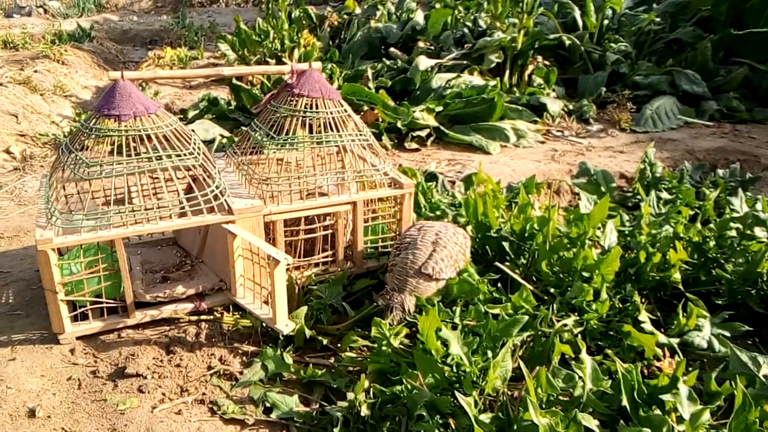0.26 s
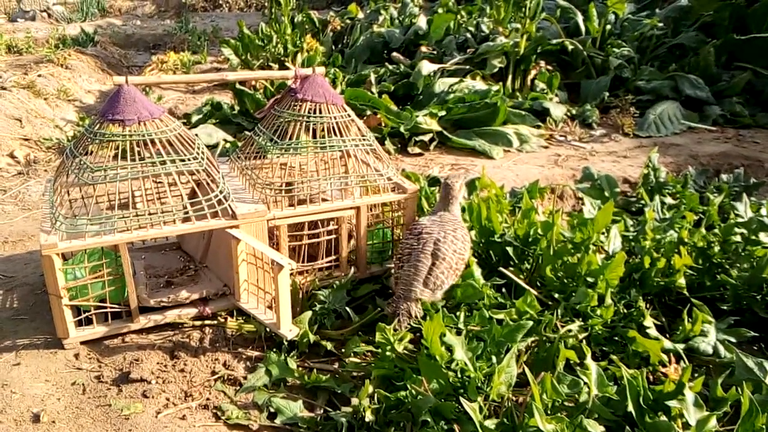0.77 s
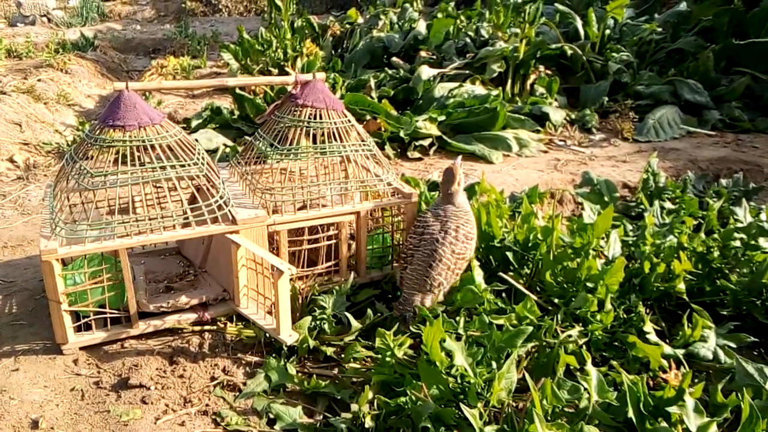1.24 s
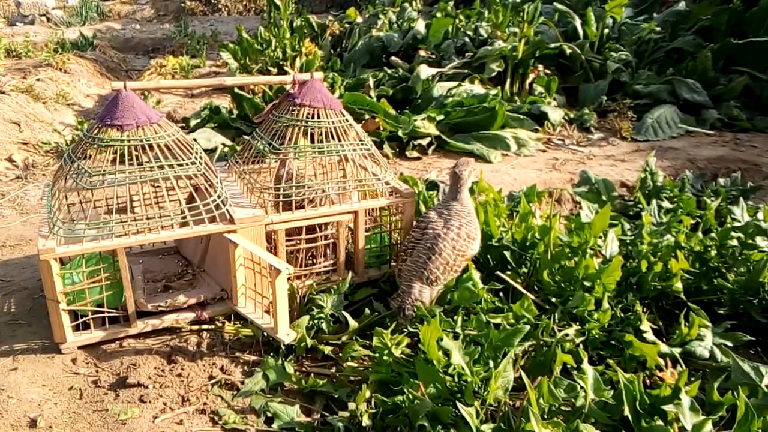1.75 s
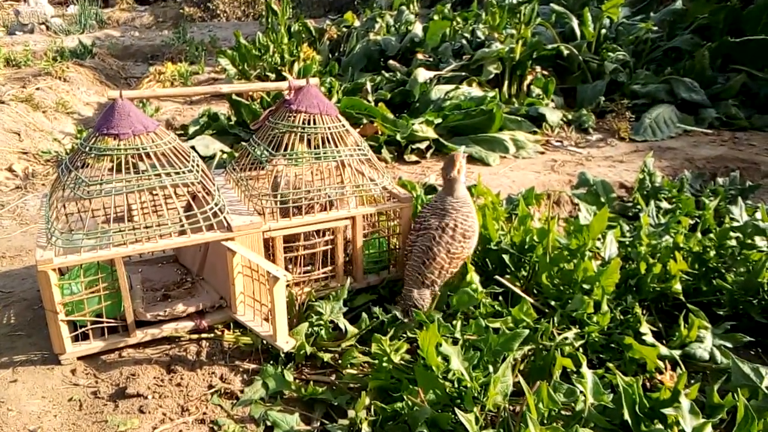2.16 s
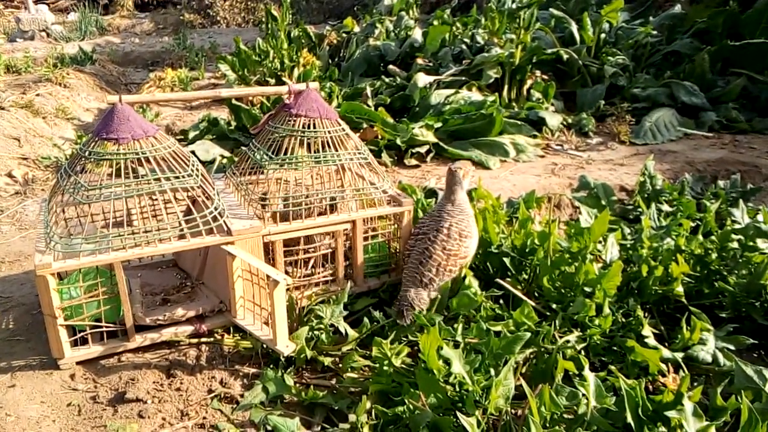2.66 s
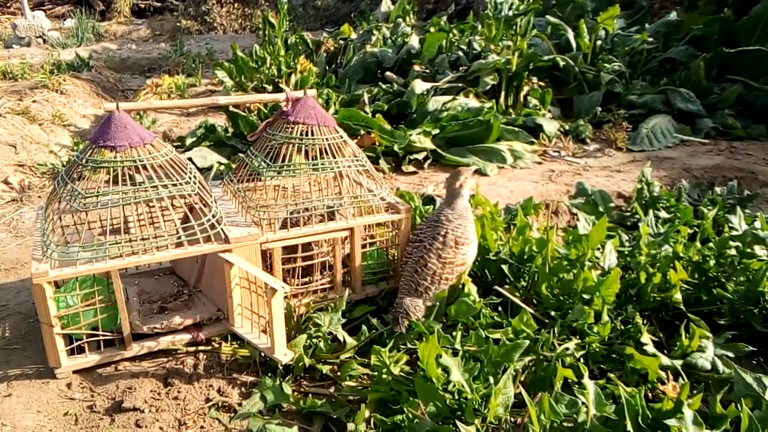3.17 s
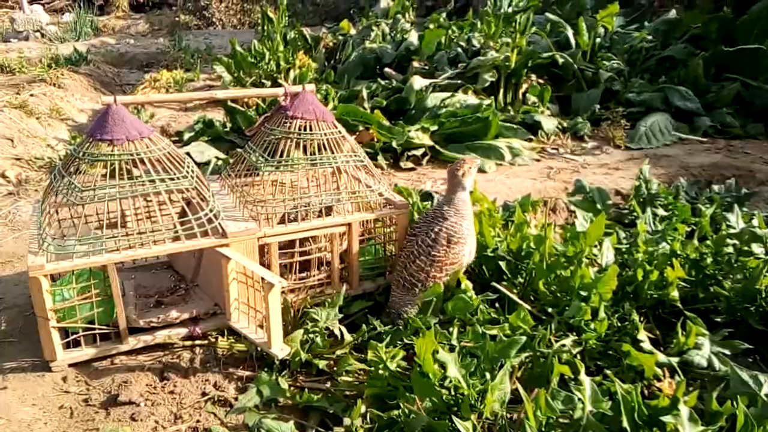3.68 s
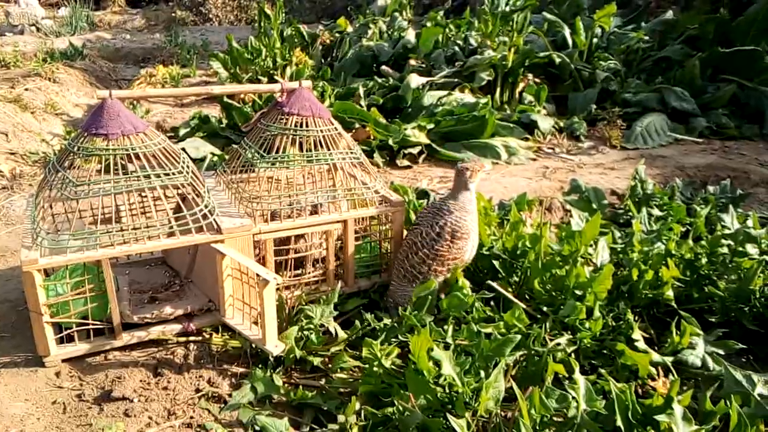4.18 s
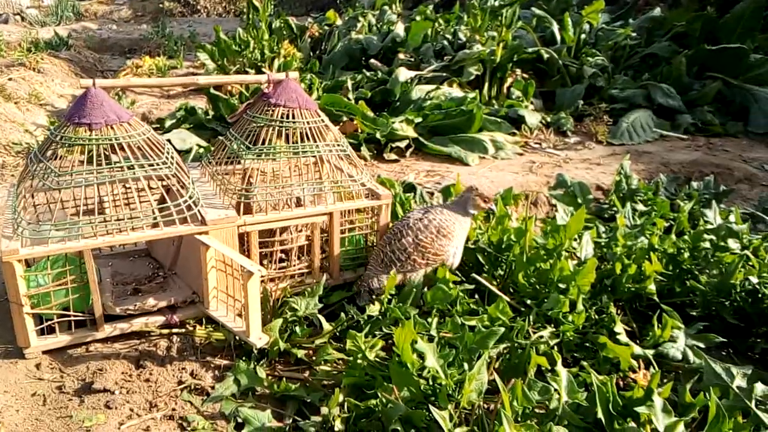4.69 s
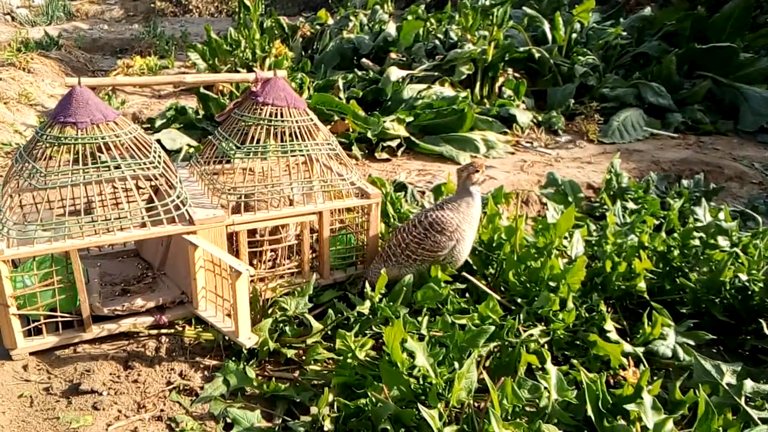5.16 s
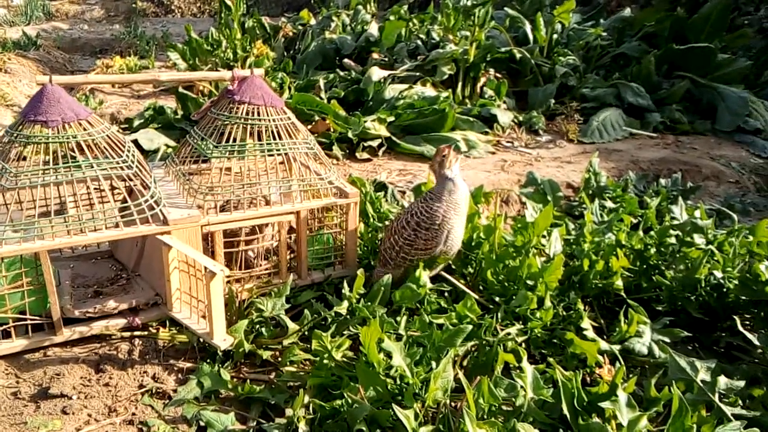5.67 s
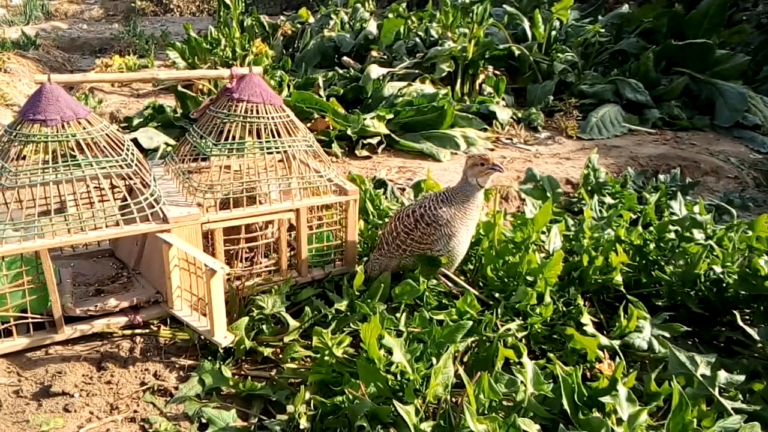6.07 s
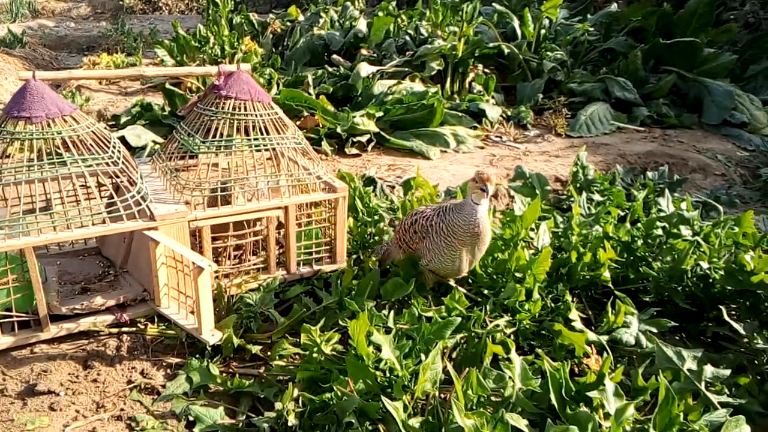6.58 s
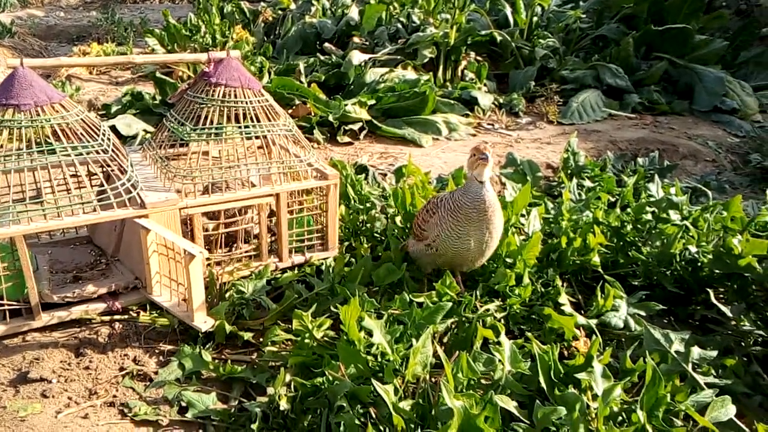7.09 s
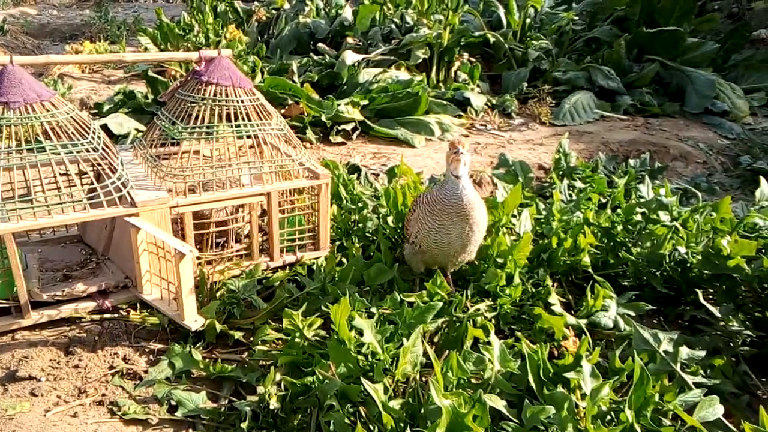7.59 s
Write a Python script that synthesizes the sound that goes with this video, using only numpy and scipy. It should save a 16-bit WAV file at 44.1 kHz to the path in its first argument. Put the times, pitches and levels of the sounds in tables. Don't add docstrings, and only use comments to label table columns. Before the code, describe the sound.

Outdoors in a leafy field, faint distant fowl murmur over soft hiss and low gusts. A thin high peep and a tiny twig tick come first. Then a francolin close to the microphone bursts into sharp yodels, croaks snapping into whistles, each usually trailed by two or three falling clucks. A caged mate answers with airy peeps between calls until the end.

```python
import sys
import numpy as np
from scipy import signal
from scipy.fft import rfft, irfft, next_fast_len
from scipy.io import wavfile
from scipy.ndimage import uniform_filter1d

SR = 44100
rng = np.random.default_rng(int(sys.argv[2]) if len(sys.argv) > 2 else 0)


def wav_out(sig):
    wavfile.write(sys.argv[1], SR, np.round(np.clip(np.atleast_2d(sig).T, -1, 1) * 32767).astype(np.int16))


def volts_from_decibels(level):
    exponent = np.asarray(level, float) / 20
    return 10 ** exponent


N = 345744


def band(x, lo_hz, hi_hz, order=2):
    return signal.sosfilt(signal.butter(order, [lo_hz, min(hi_hz, .45 * SR)], "band", fs=SR, output="sos"), x)


def unit(x):
    return x / np.sqrt(np.mean(x ** 2))


def colour(points, hz):
    point_hz, level_db = np.transpose(points)
    return np.interp(np.log(hz), np.log(point_hz), level_db)


def walk(rate_hz, size=N):
    k = max(int(SR / rate_hz), 2)
    noise = rng.standard_normal(size + k)
    return unit(uniform_filter1d(uniform_filter1d(noise, k), k))[:size]


def add(out, start_s, x):
    i = int(start_s * SR)
    out[i:i + len(x)] += x[:N - i]


def fade(size, edge_s):
    i = np.arange(size)
    to_edge = np.minimum(i, size - i) / (edge_s * SR)
    return np.sin(np.pi / 2 * np.clip(to_edge, 0, 1)) ** 2


def smooth_path(at, points, values):
    return lambda parts: uniform_filter1d(np.interp(at, points, values), len(at) // parts, mode="nearest")


def glides(rows, shape):
    share, rise, shape_db = np.transpose(shape)
    return [np.transpose([start_s + share * length_s, from_hz + rise * (to_hz - from_hz), level_db + shape_db])
            for start_s, length_s, from_hz, to_hz, level_db in rows]


def tones(notes, partials, edge_s, shiver, rasp=0.):
    out = np.zeros(N)
    lead = np.argmax(np.array(partials)[:, 1])
    for note in notes:
        point_s, point_hz, point_db = np.transpose(note)
        t = np.arange(max(point_s[0] - edge_s, 0), point_s[-1] + edge_s, 1 / SR)
        wobble = walk(400., size=12000)[:len(t)]
        flutter = walk(140.0, size=12000)[:len(t)]
        pitch_hz = smooth_path(t, point_s, point_hz)(10)
        level_db = smooth_path(t, point_s, point_db)(10)
        phase = np.cumsum(2 * np.pi * pitch_hz * (1 + shiver * wobble) / SR)
        wave = 0
        for i, (multiple, partial_db) in enumerate(partials):
            waver_db = 0 if i == lead else 2.2 * np.roll(flutter, 90 * i)
            wave = wave + volts_from_decibels(partial_db + waver_db) * np.sin(multiple * phase)
        wave = wave * (1 + rasp * walk(2500., size=12000)[:len(t)])
        swell = fade(len(t), 2 * edge_s) * volts_from_decibels(level_db + 58 * shiver * flutter)
        add(out, t[0], np.sqrt(2) * wave * swell)
    return out


# frequency_hz, level_db
FIELD_COLOUR = [(25, -15), (45, -6.5), (100, -3), (160, -10), (250, -18), (500, -17.5), (1200, -26),
                (2500, -28.5), (4000, -32.5), (6500, -30), (7600, -45.5), (13500, -39.5), (15200, -39.5),
                (16500, -49)]
# time_s, level_db
GUSTS = [(0.0, -71), (0.89, -64), (2.289, -71.5), (2.31, -62.5), (4.319, -64), (4.929, -59.5),
         (4.979, -78.5), (5.22, -59), (5.68, -64), (6.66, -59.5), (6.77, -74), (6.99, -56.5), (7.03, -72.5),
         (7.38, -59), (7.401, -74), (7.84, -68)]


def field():
    gust_s, gust_db = np.transpose(GUSTS)
    gust_db = np.interp(np.arange(N) / SR, gust_s, gust_db - np.mean(gust_db))
    size = next_fast_len(N)
    hz = np.arange(1, size // 2 + 2) * SR / size
    hiss = rfft(rng.standard_normal(size)) * volts_from_decibels(colour(FIELD_COLOUR, hz))
    out = 0
    for centre_hz in 32 * 2 ** np.arange(10):
        share = np.cos(np.pi / 2 * np.clip(np.log2(hz / centre_hz), -1, 1)) ** 2
        bass = np.clip(250 / centre_hz - .6, 0, 1)
        flicker_db = (1.2 + 1.5 * bass) * walk(7.)
        out = out + irfft(hiss * share, size)[:N] * volts_from_decibels(flicker_db + gust_db * bass)
    return volts_from_decibels(-62) * unit(out)


# start_s, length_s, from_hz, to_hz, level_db
FAR_FOWL_NOTES = [
    (0, 0.14, 778, 798, -72),
    (.03, 0.064, 1480, 1450, -70),
    (.26, 0.25, 1124, 1086, -69),
    (1.45, 0.18, 850, 847, -64),
]
# note_share, rise_share, level_db
CHIRP_SHAPE = [(0, 0.063, -7.5), (0.601, 0.45, -2.5), (0.999, 0.88, -5)]


def far_fowl():
    return tones(glides(FAR_FOWL_NOTES, CHIRP_SHAPE), [(0.99, 0.034)], edge_s=.01, shiver=0.05)


# start_s, length_s, level_db, low_edge_hz
RUSTLE_BURSTS = [
    (0.703, 0.0042, -69.5, 294),
    (2.315, 0.085, -47.5, 2420),
]


def rustles():
    out = np.zeros(N)
    for start_s, length_s, level_db, low_hz in RUSTLE_BURSTS:
        share = np.arange(int(length_s * SR)) / (length_s * SR)
        burst = unit(band(rng.standard_normal(6000), low_hz, 13000.0, order=1))[:len(share)]
        add(out, start_s, volts_from_decibels(level_db) * burst * np.sin(np.pi * share ** 0.85) ** 2.9)
    return out


# start_s, length_s, early_db, late_db, centre_hz
AIR_RUSHES = [
    (0.353, 0.17, -59, -46, 4180),
    (1.091, 0.18, -47, -43.5, 4010),
    (1.939, 0.18, -58, -38, 3590),
    (2.831, 0.3, -50.5, -44.5, 3680),
    (3.879, 0.18, -40.5, -34, 3480),
    (4.839, 0.12, -45, -40, 3550),
    (5.77, 0.17, -44.5, -42.5, 3640),
    (6.535, 0.22, -41.5, -42.5, 3470),
    (7.513, 0.21, -52.5, -47, 3520),
]
# frequency_hz, width_hz, level_db
AIR_RESONANCES = [(390, 140, -22), (890, 1200, -22), (1690, 390, -15.5), (5560, 890, -24)]


def mate_breath():
    out = np.zeros(N)
    rest = 0
    for hz, width_hz, level_db in AIR_RESONANCES:
        mode = band(rng.standard_normal(N), hz - width_hz / 2, hz + width_hz / 2)
        rest = rest + volts_from_decibels(level_db) * unit(mode)
    for start_s, length_s, early_db, late_db, hz in AIR_RUSHES:
        n = int(length_s * SR)
        rush = unit(band(rng.standard_normal(16000), 0.83 * hz, 1.148 * hz, order=3))[:n]
        rush = rush + rest[int(start_s * SR):][:n]
        swell_db = [early_db - 20.0, early_db, late_db, late_db - 19.5]
        add(out, start_s, rush * volts_from_decibels(np.interp(np.arange(n) / n, [0, .15, .8, 1], swell_db)))
    return out


# start_s, length_s, from_hz, to_hz, level_db
UPSWEEPS = [(1.96, 0.015, 2690, 3250, -41.5), (1.977, 0.028, 2780, 3147, -32.5),
            (1.999, 0.013, 3165, 3410, -33), (2.824, 0.012, 2600, 2827, -50),
            (2.84, 0.029, 2680, 3275, -40.5), (4.835, 0.012, 2920, 3294, -44),
            (4.847, 0.018, 2730, 3145, -26.5), (5.892, 0.02, 2787, 3120, -34),
            (6.545, 0.03, 2746, 3225, -29.5), (7.629, 0.03, 2870, 3159, -27.5)]
# start_s, length_s, from_hz, to_hz, level_db
HELD_TONES = [(2.013, 0.11, 2677, 2993, -27.5), (3.945, 0.078, 2988, 3033, -31.5),
              (4.868, 0.11, 2714, 2935, -22.5), (5.8, .094, 2772, 2780, -28.5),
              (6.57, .13, 2726, 2782, -23.5), (7.53, 0.12, 2720, 2880, -28.5)]
# start_s, length_s, from_hz, to_hz, level_db
HIGH_UPSWEEPS = [(.371, .017, 4160, 4710, -45), (.387, .033, 4085, 4725, -34),
                 (.355, .021, 3455, 3855, -45), (1.101, .019, 4210, 4440, -43),
                 (.499, .019, 4570, 4470, -43)]
# start_s, length_s, from_hz, to_hz, level_db
HIGH_HELD_TONES = [(.422, 0.07, 4040, 4480, -31), (1.133, 0.066, 4260, 4200, -35.5),
                   (1.21, 0.048, 4250, 4380, -46), (.392, 0.079, 3750, 3720, -46.5),
                   (.455, 0.036, 3740, 3800, -48), (1.113, 0.031, 3740, 3910, -29),
                   (1.14, .07, 3840, 3700, -44)]
# start_s, length_s, from_hz, to_hz, level_db
FAINT_PEEPS = [
    (2.86, 0.057, 2628, 3220, -38),
    (2.91, 0.125, 2540, 2700, -42),
    (3.042, 0.045, 2715, 3240, -31.5),
    (3.885, 0.066, 3337, 3490, -40.5),
]
# note_share, rise_share, level_db
HOLD_SHAPE = [(0, 0.081, -13.5), (.3, 0.45, -3), (.65, 0.8, -1), (1, 1, -4)]


def mate():
    peeps = glides(UPSWEEPS, CHIRP_SHAPE) + glides(HELD_TONES, HOLD_SHAPE)
    high = glides(HIGH_UPSWEEPS, CHIRP_SHAPE) + glides(HIGH_HELD_TONES, HOLD_SHAPE)
    out = tones(peeps, [(1, 0.0), (2, -39.5)], edge_s=0.0044, shiver=0.0045, rasp=0.17)
    out = out + tones(high, [(0.99, 0.029)], edge_s=0.0094, shiver=0.0084)
    faint = tones(glides(FAINT_PEEPS, CHIRP_SHAPE), [(1, 0)], edge_s=.005, shiver=.007, rasp=.3)
    return out + faint * np.abs(1 + .7 * walk(110.)) + mate_breath()


# frequency_hz, level_db
TRACT_COLOUR = [(250, -28.5), (480, -2), (620, -22.5), (900, 0.5), (1300, 0.5), (2500, -4), (4000, -11.5),
                (5600, -8.5), (7300, -12.5), (8300, -30.5), (13000, -11), (15000, -8), (16500, -39.5)]
# frequency_hz, width_hz, level_db
PIPE_RESONANCES = [(1324.7, 185, 7), (1819, 270, 6), (2861, 190, 6.5), (3707.4, 160, 9), (4125, 330, 9.5),
                   (5120, 110, 6), (6300, 430, 5.5)]


def croaks(notes, shape):
    out = np.zeros(N)
    points, *moves = np.transpose(shape)
    grid_hz = np.geomspace(50, SR / 2, 600)
    body_db = colour(TRACT_COLOUR, grid_hz)
    for hz, width_hz, level_db in PIPE_RESONANCES:
        body_db = body_db + level_db * np.exp(-((grid_hz - hz) / width_hz) ** 2)
    for start_s, length_s, top_hz, level_db, beak_hz, odd_db, swell_db, hoarse, *arch in notes:
        split, lean = arch or (-1, 1)
        wobble, drift = walk(470.0, size=6000), walk(170.0, size=6000)
        flutter = [walk(400., size=6000) for _ in range(5)]
        at = np.arange(points[0] * length_s * SR, points[-1] * length_s * SR) / SR / length_s
        n = len(at)
        leaned = np.sign(at) * np.abs(at) ** lean
        ratio, shape_db, beak, rough = (smooth_path(leaned, points, move)(8) for move in moves)
        pitch_hz = top_hz * ratio
        rough = rough * max(hoarse, 0)
        catch_db = 3.5 * np.clip((660 - top_hz) / 100, 0, 1)
        shape_db = shape_db + swell_db * (at - .5) - catch_db * np.exp(-((at - split) / 0.12) ** 2)
        jitter = .07 * rough ** 2 * wobble[:n] + .008 * drift[:n]
        phase = np.cumsum(2 * np.pi * pitch_hz * (1 + jitter) / SR)
        tilt = 0.43 * np.minimum(level_db + shape_db + 17, 0)
        odd = volts_from_decibels(odd_db - 22 * np.clip((split - at) / 0.064, 0, 1))
        beak_now_hz = beak_hz * beak
        hidden_hz = np.maximum(1.734 * beak_now_hz, 2850)
        note = 0
        for half in range(1, 48):
            k = half / 2
            hz = k * pitch_hz
            tone_db = np.interp(hz, grid_hz, body_db) + tilt * np.log2(hz / 1300)
            tone_db = tone_db - 22 * np.maximum(np.log2(hz / hidden_hz), 0)
            tone_db = tone_db + 13.5 * np.exp(-(np.log(hz / beak_now_hz) / 0.27) ** 2)
            shake = np.minimum(rough * (0.35 + 0.3 * k), 1.6) * flutter[half % 5][:n]
            if half % 2:
                size = 0.55 * shake
            else:
                size = (1 + 0.67 * shake) * (odd if half % 4 == 2 else 1)
            note = note + size * volts_from_decibels(tone_db) * (hz < .4 * SR) * np.sin(k * phase + .4 * k * k)
        loud = np.sqrt(uniform_filter1d(note ** 2, n // 3) + 1e-12)
        note = unit(note / loud * volts_from_decibels(shape_db) * fade(n, 0.003))
        add(out, start_s + points[0] * length_s, volts_from_decibels(level_db) * note)
    return out


# frequency_hz, level_db
CRACK_RESONANCES = [(1500, -14.5), (2350, -1.5), (3050, -1), (3800, -9)]


def cracks(times_s, levels_db):
    out, t = np.zeros(N), np.arange(-300, 300) / SR
    lead_s, width_s = .0035, .0018
    for i, (start_s, level_db) in enumerate(zip(times_s, levels_db)):
        ring = 0
        for k, (hz, mode_db) in enumerate(CRACK_RESONANCES):
            ring = ring + volts_from_decibels(mode_db) * np.sin(2 * np.pi * hz * t + i * k)
        add(out, start_s - lead_s + t[0], volts_from_decibels(level_db) * ring * np.exp(-.5 * (t / width_s) ** 2))
    return out


# multiple, level_db
WHISTLE_OVERTONES = [(1.5, -35), (2, -15), (3, -26), (4, -50), (5, -53), (6, -48)]


def whistles(starts_s, lengths_s, glide, strength_db, usual_s):
    points, glide_hz, edge_db = np.transpose(glide)
    at = np.linspace(points[0], points[-1], num=24)
    slide_hz = np.interp(at, points, glide_hz) - glide_hz[0]

    def paths(levels_db):
        return [np.transpose([start_s + at * length_s,
                              glide_hz[0] + slide_hz * length_s / usual_s,
                              np.interp(at, points, edge_db) + level_db])
                for start_s, length_s, level_db in zip(starts_s, lengths_s, levels_db)]

    lead = tones(paths(strength_db(at)), [(1, 1)], edge_s=.0015, shiver=0.0023, rasp=0.03)
    steady_db = -12.5 - 0.92 * starts_s
    return lead + tones(paths(steady_db), WHISTLE_OVERTONES, edge_s=.002, shiver=0.003, rasp=0.068)


# start_s, opening_croak_s, short_whistle_and_middle_croak_s, long_whistle_s, opening_pitch_hz
YODEL_CALLS = [
    (1.279, .058, .039, .047, 645),
    (2.109, .051, .04, .054, 707),
    (3.251, .049, .039, .056, 692),
    (4.033, .051, .04, .058, 714),
    (4.935, .049, .042, .061, 744),
    (5.657, .051, .042, .061, 712),
    (6.69, .053, .043, .061, 722),
    (7.402, .054, .041, .063, 752),
]
# note_share, pitch_ratio, level_db, beak_ratio, roughness (0-1)
OPENING_SHAPE = [(0, .75, -5.5, 0.72, 0.66), (.15, .88, 1.5, 1.03, 0.92), (.38, 1, 11.5, 0.88, 0.2),
                 (.6, 1.1, 2.5, 0.97, 0.22), (.82, .88, 10, 0.99, .3), (.95, 0.95, -0.5, 1.5, 0.45),
                 (1.049, 2, -9, 2.3, 1)]
MIDDLE_SHAPE = [(-.1, 1.3, -29.5, 1.2, 0.79), (.15, 1.12, 3, 1.5, 0.51), (.35, 1.01, 5.5, 1.1, 0.17),
                (.7, 1.01, 5, 1.2, 0.51), (.9, 1.33, 5.5, 1.3, 0.46), (1.1, 1.3, -23.5, 2.4, 0.19)]
ENDING_SHAPE = [(-.05, 1.01, -23.5, 2.1, .5), (.15, .98, 10, 1.02, 0.22), (0.448, .85, 5.5, 1, 0.87),
                (.8, .68, -1, .9, .9), (1.049, 0.72, -18, 2.3, 0.47)]
# level_above_habit_db, beak_ratio, swell_db, roughness_factor
OPENING_MANNERS = [(-1, 1.27, -1, .4), (0.5, 1.13, 2, 0.61), (0, 1.064, 3, 1.1), (-0.5, 1.07, -0.5, 0.99),
                   (-2, 1.03, -1.5, 1.2), (0, 1.05, -2.5, 1.1), (-0.5, 1.09, -1.5, 1.4),
                   (-1.5, 1.13, -5.5, 1.4)]
# whistle_share, pitch_hz, level_db
SHORT_WHISTLE_GLIDE = [(0, 2475, 0.5), (0.198, 2521, -4), (0.501, 2464, 3.5), (0.802, 2512, 1),
                       (.95, 2450, -10), (1.048, 2450, -11)]
LONG_WHISTLE_GLIDE = [(0, 2452, 1.5), (0.22, 2475, -1), (0.48, 2379, -1.5), (0.68, 2376, -1.5),
                      (.87, 2185, -0.5), (0.997, 2132, -11.5)]
# short_db, long_start_db, long_end_db, dip_share, dip_db
WHISTLE_LEVELS = [(-21, -24, -12, 0.95, 3.5), (-15, -16.5, -10.5, 0.7, 17.5), (-15.5, -17, -12, .46, 11.5),
                  (-14.5, -17.5, -10.5, 0.61, 6), (-14.5, -14.5, -13, 0.99, 2.5), (-14, -14.5, -12, .53, 6),
                  (-16, -21.5, -9, 0.55, 3), (-23, -22, -8.5, .7, 0)]
# first_db, second_db
CRACK_LEVELS = [(-15.5, -18.5), (-23, -28), (-22.5, -20.5), (-24.5, -24), (-18, -26), (-24.5, -19.5),
                (-16, -14.5), (-11.5, -13)]
HALF_PITCH_LEVELS = [-40, -48.5, -35, -46, -45.5, -43.5, -54, -49]


def yodels():
    start_s, opening_s, flip_s, long_s, pitch_hz = np.transpose(YODEL_CALLS)
    short_s, middle_s, ending_s = 0.4 * flip_s, 0.6 * flip_s, .028
    usual_s = .057
    parts_s = [opening_s, short_s, middle_s, long_s]
    short_at, middle_at, long_at, ending_at = start_s + np.cumsum(parts_s, axis=0)

    habit_db = -21.5 + 0.3 * start_s
    opening = [(s, length_s, hz, level_db + more_db, wide * 2600, -4.5, *manner)
               for s, length_s, hz, level_db, (more_db, wide, *manner)
               in zip(start_s, opening_s, pitch_hz, habit_db, OPENING_MANNERS)]
    # pitch_hz, level_db, beak_hz, odd_partials_db, swell_db, roughness_factor
    middle = [(s, length_s, 540, -25, 2293.5, -23, 0, 1) for s, length_s in zip(middle_at, middle_s)]
    ending = [(s, ending_s, 720, -26.5 - 379 * (length_s - usual_s), 2202, -3.5, 0, 1)
              for s, length_s in zip(ending_at, long_s)]
    out = croaks(opening, OPENING_SHAPE) + croaks(middle, MIDDLE_SHAPE) + croaks(ending, ENDING_SHAPE)

    short_db, first_db, last_db, dip_share, dip_db = np.transpose(WHISTLE_LEVELS)[:, :, None]

    def long_db(at):
        swell_db = (last_db - first_db) * np.clip((at - .22) / .65, 0, 1)
        return first_db + swell_db - dip_db * np.exp(-((at - dip_share) / 0.083) ** 2)

    out = out + whistles(short_at, short_s, SHORT_WHISTLE_GLIDE, lambda at: short_db + 0 * at, np.mean(short_s))
    out = out + whistles(long_at, long_s, LONG_WHISTLE_GLIDE, long_db, usual_s)
    out = out + cracks(np.transpose([short_at, long_at]).ravel(), np.ravel(CRACK_LEVELS))
    same = np.ones(len(start_s))
    half = np.transpose([long_at + 0.2 * long_s, 0.39 * long_s, 1240 * same, 1130 * same, HALF_PITCH_LEVELS])
    return out + tones(glides(half, CHIRP_SHAPE), [(1, 0.0061)], edge_s=.004, shiver=.012)


# start_s, length_s, top_pitch_hz, level_db
LOUD_CLUCKS = [(1.553, 0.079, 610, -23), (1.684, 0.068, 509, -25.5), (2.381, 0.08, 690, -22.5),
               (2.515, 0.074, 614, -22), (2.648, 0.066, 516.4, -24.5), (3.525, 0.078, 685, -21.5),
               (3.657, 0.079, 624, -22.5), (3.796, 0.069, 464.5, -27), (4.317, 0.083, 731, -21),
               (4.454, 0.079, 653.5, -21.5), (4.593, 0.066, 551, -24), (5.223, 0.08, 707.4, -20.5),
               (5.359, 0.075, 652.3, -21.5), (5.5, 0.069, 521.5, -24.5), (5.948, 0.076, 703, -19),
               (6.083, 0.075, 640, -21), (6.221, 0.067, 533.6, -24), (6.976, 0.073, 672, -20),
               (7.11, 0.069, 609, -22), (7.702, 0.073, 707.4, -21), (7.83, 0.057, 624, -20)]
# beak_ratio, swell_db, roughness_factor
LOUD_MANNERS = [(1.15, -2, .8), (1, -4.5, 1), (1.15, -1, .8), (1, 1, .8), (1, 0, 0.45), (1.1, 1, .8),
                (1, 1, 0.91), (1, -3, 0.72), (1, 0, 0.88), (1, 2, 0.9), (1, -2, 0.7), (1, 2.5, 1),
                (1, 1, 0.95), (1, -0.5, 0.66), (1, 0.5, 1), (1, 0.5, .8), (1, -5.5, 0.57), (1, -2.5, 0.96),
                (1, -3.5, 0.86), (1.05, 1.5, 1), (1, 3, 1)]
# note_share, odd_partials_above_habit_db, arch_lean (over 1 peaks late)
LOUD_SPLITS = [(0.45, -1, 1.05), (0.36, 10, 0.89), (.32, -9.5, 1.05), (0.42, -2, 1), (0.34, 9.5, 0.92),
               (.3, -8.5, .95), (0.46, -2, 1.1), (.38, 10, 1), (.3, -9, 1), (0.32, -1.5, 1), (.4, 5.5, 1),
               (.35, -8.5, 1.05), (0.31, -1.5, 1), (.45, 8.5, 1), (.35, -7, 1.2), (.35, -2.5, 1),
               (.4, 4, 1), (0.36, -6.5, 1), (0.35, -2, 1), (0.41, -6, 1), (.4, 3, 1)]
# start_s, length_s, top_pitch_hz, level_db
QUIET_CLUCKS = [
    (1.813, 0.077, 382.7, -31.5),
    (1.985, 0.031, 345.4, -44),
    (2.786, 0.07, 373, -37.5),
    (4.734, .084, 436.4, -36),
    (7.257, 0.068, 423, -29.5),
]
# beak_ratio, odd_partials_db, swell_db, roughness_factor
QUIET_MANNERS = [(1.1, -18.5, -4.5, .35), (0.91, -5.5, 5, 0.59), (0.92, -14, 1.5, 0.95),
                 (1.19, -25, 2, 0.89), (0.9, -7.5, 3, .35)]
# note_share, pitch_ratio, level_db, beak_ratio, roughness (0-1)
LOUD_SHAPE = [(0, .56, -20, 1.1, 1), (0.12, .67, -9, 1.185, 0.5), (.28, .81, 0, 1.25, 0.24),
              (0.421, .92, -1, 1.18, 0.3), (.6, 0.99, 1, 1, 0.33), (.8, .89, -1, 0.83, 0.55),
              (1.02, .66, -14, 0.78, 0.7)]
QUIET_SHAPE = [(0, .5, -17.5, 1.3, .8), (0.151, .64, -5.5, 1.1, 0.32), (0.349, .92, 0.5, 0.93, 0.11),
               (0.548, 1, -2, 1, 0.05), (.72, .93, -4, 1, .12), (0.881, 0.62, -5.5, 0.96, 0.63),
               (1.001, .5, -29, 1.5, 0.58)]


def clucks():
    loud = []
    for row, (wide, *manner), (split, more_odd_db, lean) in zip(LOUD_CLUCKS, LOUD_MANNERS, LOUD_SPLITS):
        above_hz = row[2] - 600
        beak_hz = wide * (1755 + 3.65 * above_hz)
        odd_db = more_odd_db - 3 + 0.13 * above_hz
        loud.append((*row, beak_hz, odd_db, *manner, split, lean))
    soft = [(*row, wide * 1200, *manner, .46, 1) for row, (wide, *manner) in zip(QUIET_CLUCKS, QUIET_MANNERS)]
    return croaks(loud, LOUD_SHAPE) + croaks(soft, QUIET_SHAPE)


def francolin():
    voice = clucks() + yodels()
    size = next_fast_len(N)
    hz = np.arange(size // 2 + 1) * SR / size
    sheen = irfft(rfft(voice, size) * np.clip(hz / 10500 * 10 - 9, 0, 1), size)[:N]
    turn_db = 1.5 * (np.arange(N) / SR - 4.1)
    return voice + sheen * (volts_from_decibels(turn_db) - 1)


def scattered_echo(birds):
    t = np.arange(SR // 2) / SR
    far_t60_s, far_delay_s, leaf_db, leaf_t60_s = 0.93, 0.047, 21, 0.12
    far = volts_from_decibels(-60 * t / far_t60_s) * np.clip(t / far_delay_s, 0, 1)
    leaves = volts_from_decibels(leaf_db - 60 * t / leaf_t60_s)
    scatter = band(rng.standard_normal(len(t)), 900.0, 6700.0, order=1) * (far + leaves)
    return volts_from_decibels(-20.5) * signal.fftconvolve(birds, unit(scatter) / np.sqrt(len(t)))[:N]


def bank_echo(near):
    t = np.arange(SR // 2) / SR
    bank = rng.standard_normal(len(t)) * np.exp(-.5 * ((t - .085) / .006) ** 2)
    reflection = signal.fftconvolve(near, bank / np.linalg.norm(bank))[:N]
    return volts_from_decibels(-36) * band(reflection, 900., 5500.)


def scene():
    near, caged = francolin(), mate()
    echoes = scattered_echo(near + volts_from_decibels(-9) * caged) + bank_echo(near)
    mix = near + caged + echoes + rustles() + field() + far_fowl()
    return mix[None] * fade(N, 0.0012)


def roll_off(x):
    return signal.sosfilt(signal.butter(12, 15950, fs=SR, output="sos"), x)


def record(dry):
    mix = dry + volts_from_decibels(9.0) * band(dry, 14200., 17000.0)
    return roll_off(mix)


dry = scene()
out = record(dry)
wav_out(out)
```